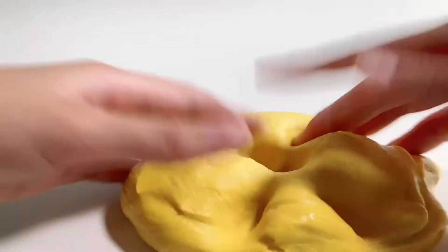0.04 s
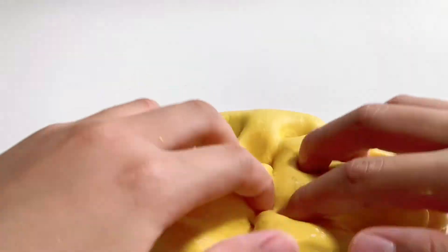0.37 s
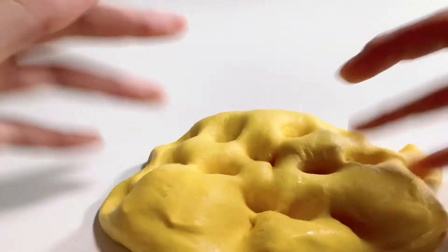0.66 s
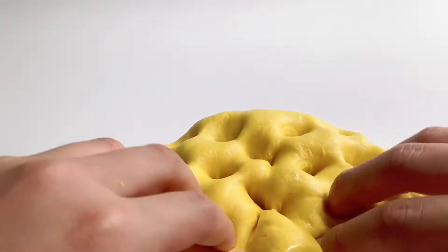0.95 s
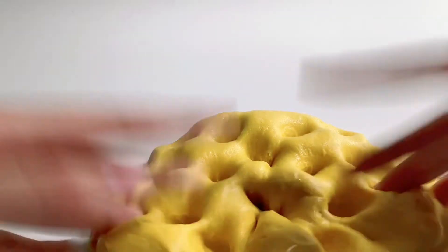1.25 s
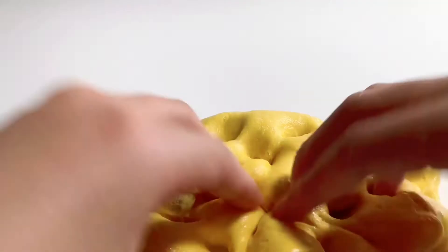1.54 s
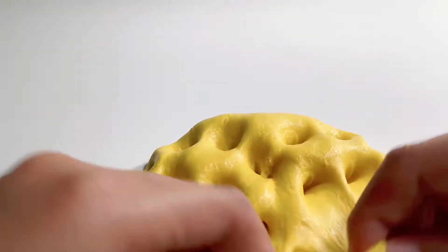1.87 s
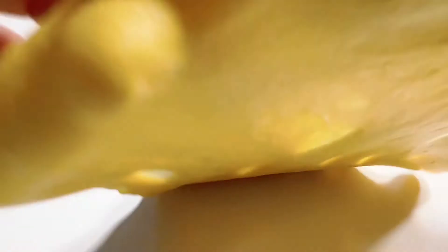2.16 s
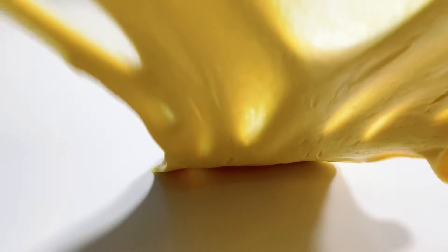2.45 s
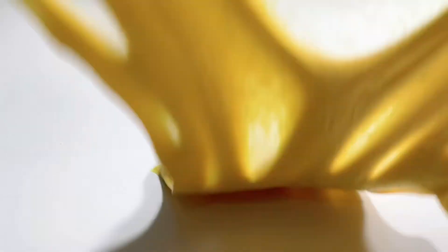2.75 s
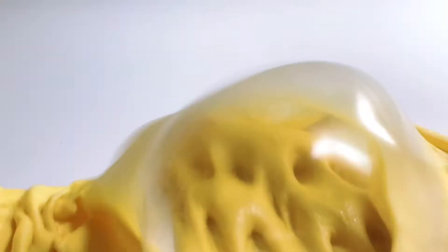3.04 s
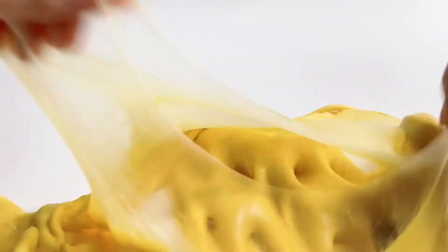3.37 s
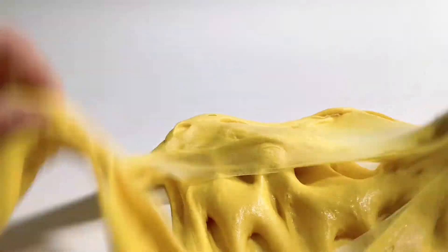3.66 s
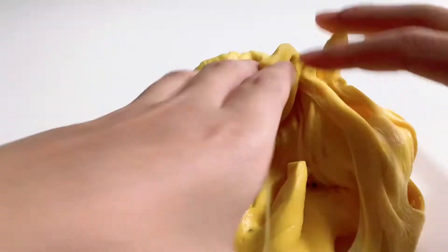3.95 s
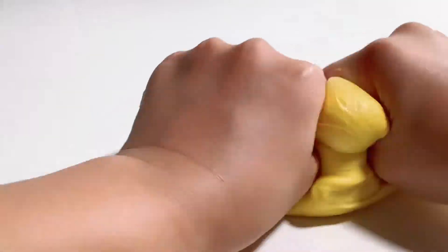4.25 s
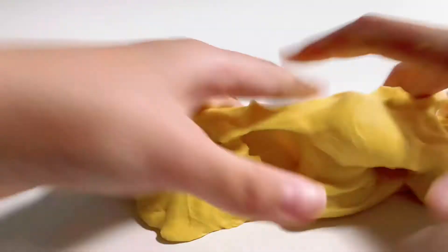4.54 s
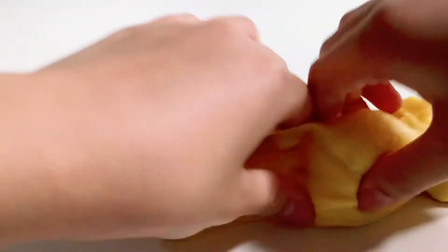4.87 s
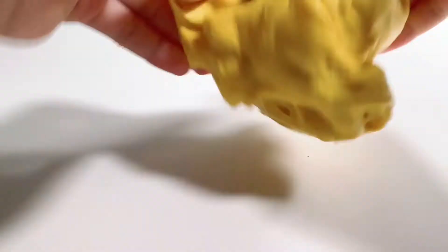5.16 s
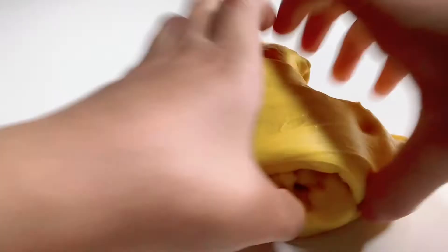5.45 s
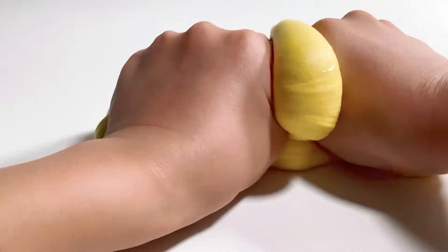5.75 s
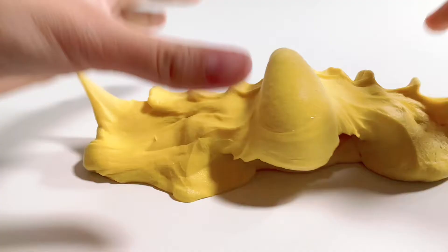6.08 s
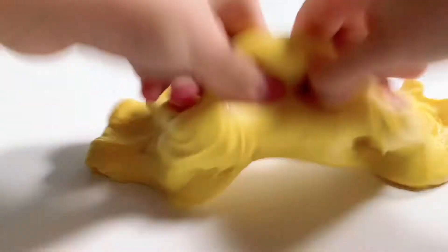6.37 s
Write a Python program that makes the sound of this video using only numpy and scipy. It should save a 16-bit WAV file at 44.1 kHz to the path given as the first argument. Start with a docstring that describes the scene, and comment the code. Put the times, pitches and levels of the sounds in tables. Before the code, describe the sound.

Close up in a small room, soft sticky slime is worked by hand on a table. Trapped air bursts in short pops that drop in pitch, mixed with thin snaps, first in separate bunches as fingers press in. A soft, fizzy stretch leads to one strong pop. Then the slime is folded and squeezed, squelching and crackling with soft thuds and another run of pops over a faint hum.

```python
"""Soft clay slime, poked, stretched and kneaded by hand on a table, close up in a small room.
Trapped air pockets burst with sticky snaps and short pops that fall in pitch as the hole relaxes.
The slime squelches and fizzes as it peels from skin and table top; presses thud, air hisses through folds.
The table colours the sound and the room echoes it, over a faint hum and a very quiet, even tick."""
import sys
import numpy as np
from scipy import signal
from scipy.fft import rfft, irfft
from scipy.io import wavfile
from scipy.ndimage import uniform_filter1d

SR = 44100
rng = np.random.default_rng(int(sys.argv[2]) if len(sys.argv) > 2 else 0)


def materialize(psi):
    """Save the field psi as 16-bit PCM at rate SR to the path in sys.argv[1].

    A 1-D psi becomes a single channel; in a 2-D psi each row is a channel.
    """
    bounded = np.clip(np.atleast_2d(psi).T, -1, 1)
    quanta = np.round(bounded * 32767).astype(np.int16)
    wavfile.write(sys.argv[1], SR, quanta)


N = 291501

# Bursting air pockets. Each row: start in seconds, pop level in dB, final pitch in Hz, fall in octaves,
# skin snap level in dB, snap brightness in dB, snap length in seconds.
AIR_POCKETS = [(0.001, -19, 283, 1.32, -38, -27.5, 0.0093), (0.0315, -17.5, 957, 1.28, -25.5, 10.5, 0.0057),
               (0.555, -23, 330, 2.7, -28, -14.5, 0.0037), (0.5739, -15.5, 600, 1.22, -23.5, -2.5, 0.005),
               (0.5805, -20, 318, 0.88, -44, -2.5, .004), (0.5936, -27, 340, 2.2, -23, -13, 0.0025),
               (0.6205, -15.5, 463, 2.1, -26.5, -2, 0.0043), (0.642, -19.5, 370, 2.1, -25.5, 0, 0.002),
               (1.2135, -12, 416, 1.87, -18.5, -6.5, 0.0033), (1.2175, -12.5, 311, 1.09, -46, -2, .003),
               (1.2301, -21, 380, 2.08, -20.5, -11.5, 0.002), (1.25, -20, 513, 1.34, -23.5, -10.5, 0.0016),
               (1.255, -26.5, 407, 1.2, -28.5, 14.5, .0024), (1.522, -28.5, 165, 1.19, -52, -12, 0.0025),
               (1.662, -43, 680, 1.3, -51.5, -10.5, 0.0024), (2.882, -23, 275, 2.6, -32, 12.5, 0.0035),
               (2.8888, -32, 322, 2.5, -28.5, -17.5, 0.013), (2.9224, -10, 660, 1.57, -16, -7.5, 0.0029),
               (3.123, -48.5, 330, 2.1, -64, -26, 0.0026), (3.5142, -26.5, 191, 1.09, -46, 1, 0.0053),
               (3.5612, -33.5, 870, 0.63, -46, -21.5, 0.0034), (4.0393, -31, 220, 2.1, -50, -14, 0.0043),
               (4.058, -29.5, 313, 1.55, -41, -15.5, 0.0089), (4.119, -31, 294, 0.85, -36.5, -10, 0.0044),
               (4.14, -17.5, 202, 0.23, -57, -6, .004), (4.2151, -20.5, 803, 0.85, -24.5, -7.5, 0.0016),
               (4.41, -21.5, 373, 0.48, -38, -6, 0.0081), (4.463, -27, 427, 0.38, -36, -15, 0.0037),
               (4.9015, -31, 397, 0.68, -22, 8, 0.0015), (5.151, -30, 323, 1.4, -47, -23, .004),
               (5.1767, -20.5, 325, 1.894, -39, -11.5, 0.004), (5.471, -21.5, 282, 1.49, -43.5, 9, .005),
               (5.483, -13, 238, 1, -46, 0, .004), (5.503, -17, 272, .9, -46, 6, .004),
               (5.521, -23.5, 310, 1.12, -44, -2, .004), (5.6397, -8.5, 380.4, 2.134, -13, -9, 0.0027),
               (5.655, -12.5, 338, 0.98, -27, -1, 0.0027), (5.697, -26, 340, 0.72, -20, 17, 0.0023),
               (5.876, -42, 443, 1.64, -33.5, -1, 0.0027), (5.8956, -26, 347, 1.32, -27.5, -10, 0.0072),
               (5.95, -11.5, 1590, 0.14, -30.5, -19, .004), (5.953, -12, 1150, 0.3, -42, -4, 0.0035),
               (6.429, -29, 340, 1.66, -55, 0, 0.004), (6.4903, -29.5, 698, 1.02, -33.5, 9, 0.0058),
               (6.595, -24, 954, 1.1, -41, 17, 0.0026), (6.6027, -27, 1010, 0.59, -44, 7, 0.0034)]
# Sticky films with no air behind them.
# Each row: start in seconds, level in dB, brightness in dB, length in seconds.
FILM_SNAPS = [(0.306, -52.5, 4.5, 0.0025), (0.6083, -27, 8, 0.0053), (0.6153, -33, 6, 0.0081),
              (1.266, -34, 7, .0027), (1.494, -46.5, 0, 0.001), (1.5973, -42, 11, 0.0013),
              (1.617, -38.5, 7, 0.0012), (1.652, -44, 15, .0017), (1.973, -39, 19, 0.0017),
              (2.039, -49, -2, 0.0019), (2.8433, -42, -2.5, 0.0039), (2.8775, -27.5, 3, .005),
              (3.2315, -34, 17.5, .0013), (3.3294, -38.5, -11, 0.0034), (3.724, -45, -16, 0.003),
              (3.8387, -48, -12, 0.004), (3.8596, -36.5, -5.5, 0.00088), (4.2621, -34, 22.5, 0.0012),
              (4.429, -31.5, -4.5, 0.006), (4.479, -31, -16, 0.007), (4.785, -62, -24, 0.0011),
              (5.188, -34.5, 19, 0.0023), (5.433, -46, -7, 0.0015), (5.454, -51.5, -1, 0.0088),
              (5.525, -31, -5.5, 0.0047), (5.573, -26, 5, 0.00073), (5.586, -31.5, 1, 0.0028),
              (5.6043, -31.5, -9, 0.0024), (6.261, -47, 3, 0.0021), (6.287, -46.5, 17, 0.0077),
              (6.3177, -43, 0, 0.015)]
# Squeezes and peels. Each row: start in seconds, end in seconds, squelch level in dB, fizz level in dB.
HAND_STROKES = [(-0.03, 0.032, -24.5, -41.5), (0.527, 0.643, -29, -50.5), (1.196, 1.254, -30.5, -43.5),
                (1.52, 1.679, -53, -65), (1.784, 1.821, -60.5, -41.5), (1.813, 1.906, -49.5, -43.5),
                (1.89, 1.984, -58.5, -47.5), (1.953, 2.06, -70, -51.5), (2.1, 2.33, -92, -70),
                (2.762, 2.87, -62, -58.5), (2.872, 2.903, -27, -42.5), (3.223, 3.362, -52, -57),
                (3.33, 3.414, -64, -54.5), (3.396, 3.51, -67, -64), (3.516, 3.623, -51.5, -51),
                (3.632, 3.732, -56, -50), (3.765, 3.868, -59, -72.5), (3.971, 4.103, -52, -47),
                (4.084, 4.18, -45, -55), (4.174, 4.214, -36.5, -54), (4.186, 4.403, -94, -53),
                (4.374, 4.525, -33, -41), (4.8, 4.916, -58.5, -61.5), (4.881, 4.928, -38, -41.5),
                (5.024, 5.104, -58, -56), (5.13, 5.228, -44, -55), (5.256, 5.32, -51.5, -59),
                (5.324, 5.452, -72, -66), (5.476, 5.527, -32, -40), (5.52, 5.64, -46, -50.5),
                (5.6, 5.738, -39.5, -43), (5.803, 5.95, -36, -42), (5.914, 5.956, -25.5, -40.5),
                (5.94, 6.052, -40, -58.5), (6.1, 6.257, -54.5, -69), (6.246, 6.355, -44.5, -53),
                (6.36, 6.593, -59.5, -65), (6.584, 6.618, -40, -47.5)]
# Fingers pressing the lump against the table. Each row: start in seconds, relative level in dB.
PRESSES = [(0.010, -29), (0.565, -25), (1.216, -22), (1.519, -32.5), (2.885, -16), (2.925, -32),
           (2.961, -43), (3.305, -36.5), (3.516, -29), (4.035, -24.5), (4.130, -20), (4.184, -25.5),
           (4.467, -28), (5.178, -35.5), (5.482, -24), (5.946, -27), (6.120, -36.5)]
# Air forced through folds.
# Each row: middle in seconds, quarter of the length in seconds, pitch in Hz, level in dB.
FOLD_LEAKS = [(2.89, 0.011, 1150, -32), (4.297, 0.086, 4430, -58.5), (5.029, 0.026, 1330, -63),
              (5.491, 0.0089, 2030, -44.5), (5.700, .050, 730, -35), (5.942, 0.012, 1750, -34),
              (6.082, .015, 1740, -58), (6.208, 0.056, 4280, -65)]
# Layer spectra. Each row: frequency in Hz, gain in dB.
SNAP_SPECTRUM = [(300, -7.5), (900, 1.5), (1600, -0.5), (3500, 3), (6000, 1), (10000, 3.5), (14500, 2),
                 (16500, -23.5)]
SQUELCH_SPECTRUM = [(40, -20), (80, -9), (150, -5.5), (250, -3.5), (340, 5.5), (480, 3), (750, -4.5),
                    (1100, -14), (2000, -43.5)]
CRACKLE_SPECTRUM = [(400, -18), (800, 4.5), (1200, -1), (2000, -3.5), (3200, -2), (5000, -20),
                    (9000, -49.5)]
FIZZ_SPECTRUM = [(1800, -35.5), (3200, -8), (4500, -2), (6300, -5), (8000, -2.5), (11000, -2.5),
                 (14500, -3), (15500, -8.5), (16200, -36)]
THUD_SPECTRUM = [(25, -38), (45, -4), (65, 1), (100, -6), (145, 6.5), (200, 0.5), (300, -12.5), (600, -38)]
HUM_SPECTRUM = [(25, -18), (42, -17.5), (56, 16), (85, -8), (120, 3.5), (200, -8), (350, -8.5),
                (800, -22.5), (2800, -35), (4600, -35.5), (5500, -19.5), (6600, -35.5), (13000, -28.5),
                (16000, -38)]
# Table-top peaks and dips. Each row: centre in Hz, width in Hz, gain in dB.
TABLE_BANDS = [(264, 25, 0.5), (302.8, 6.1, -11), (340, 81, 5), (390, 57, -11.5), (452, 54, 4.5),
               (628, 30, -9.5), (869, 110, -6.5), (1109, 94, 5), (1445, 210, 7), (2060, 200, 4.5)]
# Room echo. Each row: frequency in Hz, gain in dB, T60 in seconds.
ECHO_BANDS = [(107.3, -10.5, 0.41), (250, -19, 0.15), (600, -16, 0.3), (1065, -16, 0.49), (1700, -15, 0.51),
              (4000, -16, 0.49), (8900, -11.5, 0.36), (14900, -13.5, 0.31)]
# Rings of the background tick. Each row: pitch in Hz, width in Hz, gain in dB.
TICK_MODES = [(2530, 310, -33), (4250, 490, -35)]


def pops(cycles_to_swell=1.05, tail=0.13, tail_swells=5.1, overtone=0.26, overtone_ratio=2.153):
    """Each pocket rings a few cycles, dropping in pitch as the hole relaxes; then the lump recoils."""
    out, t = np.zeros(N), np.arange(SR // 8) / SR
    flutter, waver = drift(rate_hz=900), drift(rate_hz=350)
    bursts = [row[:4] for row in AIR_POCKETS]
    recoils = [recoil(start_s, db, fall_oct) for start_s, db, _, fall_oct in bursts]
    for start_s, db, hz, fall_oct in bursts + recoils:
        age = t * hz / cycles_to_swell  # big, low pockets open more slowly
        # the ragged hole wavers more as it slackens
        wander = np.take(waver, round(start_s * SR) + np.arange(len(t)), mode="wrap")
        wobble_oct = 0.16 * np.tanh(age / 2) * wander
        phase = 2 * np.pi * np.cumsum(hz * 2 ** (fall_oct * np.exp(-age) + wobble_oct)) / SR
        swell = age * np.exp(1 - age)
        pulse = swell * np.exp(-0.12 * (age - 1) ** 2)
        after_ring = (1 - np.exp(-age)) * np.exp(-age / tail_swells)
        envelope = (1 - tail) * pulse + tail * after_ring
        # wide tears add an overtone
        upper = overtone * fall_oct / 2 * swell * np.sin(overtone_ratio * phase)
        add(out, start_s, from_db(db) * envelope * (np.sin(phase) + upper))
    return out * (1 + 0.61 * flutter)


def recoil(pop_s, pop_db, pop_fall_oct, delay_s=0.0036, hz=342.8, fall_oct=0.9, hard_pop_db=-11.5):
    """Pop row for the lump springing back; gentle bursts and pockets that open less kick less."""
    loss_db = 4 * max(2 - pop_fall_oct, 0)
    db = -14 + 1.2 * (pop_db - hard_pop_db) - loss_db
    return pop_s + delay_s, db, hz, fall_oct


def snaps(uneven_db=7.5, dull_hz=3500, pivot_hz=5500, base_ring_hz=6400, bright_db_per_oct=13.5):
    """A film or pocket skin tears in milliseconds: a dying burst of micro-clicks with one broad ring."""
    size = 1024
    out, t = np.zeros(N), np.arange(size) / SR
    pole = np.exp(-2 * np.pi * dull_hz / SR)
    skins = [(row[0], *row[4:]) for row in AIR_POCKETS]
    for start_s, db, bright_db, length_s in skins + FILM_SNAPS:
        white, sizes = rng.standard_normal((2, size))
        age = t / length_s
        burst = white * from_db(uneven_db * sizes) * (1 - np.exp(-age / 0.05)) * np.exp(-1.1 * age)
        dull = signal.lfilter([1 - pole], [1, -pole], burst)
        burst = dull + (burst - dull) * np.exp(-0.5 * age)  # treble dies first
        # thin films snap brighter and ring higher
        tilted = [(hz, gain_db + bright_db * np.clip(np.log2(hz / pivot_hz) / 2, -0.6, 0.6))
                  for hz, gain_db in SNAP_SPECTRUM]
        burst = colour(burst, tilted, size=512)
        ring_hz = np.clip(base_ring_hz * 2 ** (bright_db / bright_db_per_oct), 1900, 13700)
        burst = burst + 0.33 * resonance(burst, ring_hz, width_hz=700 + ring_hz / 7)
        add(out, start_s, from_db(db) * rms_one(burst) * np.sqrt(length_s * SR / size))
    return out


def kneading(swell_share=0.59, release_s=0.024, crackle_trim_db=-2.5):
    """Pressure builds and lets go: big pockets squelch, small ones crackle, peeling skin fizzes."""
    t, power = np.arange(N) / SR, np.zeros((3, N))
    for start_s, end_s, squelch_db, fizz_db in HAND_STROKES:
        span = slice(max(round(start_s * SR), 0), round((end_s + 0.25) * SR))
        swell = np.clip((t[span] - start_s) / (swell_share * max(end_s - start_s, 0.01)), 0, 1)
        release = np.exp(-np.maximum(t[span] - end_s, 0) / release_s)
        crackle_db = squelch_db + 0.65 * (fizz_db - squelch_db) + crackle_trim_db
        power[:, span] += (from_db([squelch_db, crackle_db, fizz_db])[:, None] * swell * release) ** 2
    squelch_gain, crackle_gain, fizz_gain = np.sqrt(power)
    squelch = colour(grains(per_s=570, spread_db=1, clump_db=7, clump_hz=160, hiss=0.21),
                     SQUELCH_SPECTRUM)
    crackle = colour(grains(per_s=850, spread_db=4, clump_db=3, clump_hz=180, hiss=0.45),
                     CRACKLE_SPECTRUM)
    fizz = colour(grains(per_s=2800, spread_db=4.5, clump_db=2.5, clump_hz=250, hiss=0.6),
                  FIZZ_SPECTRUM)
    bubbles = tiny_bubbles(per_s=170, q=7.9, low_hz=800, high_hz=7000, pitch_count=16)
    crackle = rms_one(crackle) + 0.6 * bubbles
    return squelch_gain * rms_one(squelch) + crackle_gain * rms_one(crackle) + fizz_gain * rms_one(fizz)


def grains(per_s, spread_db, clump_db, clump_hz, hiss):
    """Tiny uneven ruptures in clumps over a hiss, levelled over 30 ms."""
    sizes = uneven_sizes(spread_db) * rng.choice([-1, 1], N)
    clicks = rms_one(sizes * (rng.random(N) < per_s / SR)) + hiss * rng.standard_normal(N)
    clicks = clicks * from_db(clump_db * drift(clump_hz))
    return clicks / np.sqrt(uniform_filter1d(clicks ** 2, size=1323) + 1e-9)


def tiny_bubbles(per_s, q, low_hz, high_hz, pitch_count):
    """Pinhead bubbles burst at random, each ringing briefly at one of a set of pitches."""
    kicks = uneven_sizes(spread_db=4) * (rng.random(N) < per_s / SR)
    pitch_index = rng.integers(0, pitch_count, N)
    rings = (resonance(kicks * (pitch_index == k), hz, hz / q) / np.sqrt(hz)
             for k, hz in enumerate(np.geomspace(low_hz, high_hz, pitch_count)))
    return rms_one(sum(rings))


def thuds(gain_db=-10.5, swell_s=0.019):
    """Each finger press gives a dull rumble that swells and dies."""
    force, age = np.zeros(N), np.arange(SR // 2) / SR / swell_s
    for start_s, db in PRESSES:
        add(force, start_s, from_db(db) * age * np.exp(1 - age))
    rumble = colour(rng.standard_normal(N), THUD_SPECTRUM)
    running_rms = np.sqrt(uniform_filter1d(rumble ** 2, size=1764) + 1e-12)
    return from_db(gain_db) * force * rumble / running_rms


def leaks(q=3.8):
    """Air leaves a fold as a brief, narrow hiss, pitched by the size of the gap."""
    out = np.zeros(N)
    for middle_s, quarter_s, hz, db in FOLD_LEAKS:
        window = np.hanning(round(4 * quarter_s * SR))
        noise = rng.standard_normal(SR)[:len(window)]
        hiss = resonance(resonance(noise, hz, hz / q), hz, hz / q)
        add(out, middle_s - 2 * quarter_s, from_db(db) * window * rms_one(hiss))
    return out


def surface_ticks(gain_db=-83):
    """Tiny surface bubbles tick faintly throughout."""
    bubbles = tiny_bubbles(per_s=45, q=2, low_hz=2000, high_hz=9000, pitch_count=8)
    return from_db(gain_db) * colour(bubbles, SNAP_SPECTRUM)


def table_top(x):
    """The table top and its reflections impose a chain of peaks and dips."""
    for hz, width_hz, db in TABLE_BANDS:
        height, half_width = np.sqrt(from_db(db)), np.pi * width_hz / SR
        tuning = -2 * np.cos(2 * np.pi * hz / SR)
        b = [1 + half_width * height, tuning, 1 - half_width * height]
        a = [1 + half_width / height, tuning, 1 - half_width / height]
        x = signal.lfilter(b, a, x + 1e-18)
    return x


def room_echo(x, build_s=0.0096, band_count=9):
    """Diffuse echo: builds quickly, dies away band by band."""
    t, response = np.arange(SR // 2) / SR, 0
    build = 1 - np.exp(-(t / build_s) ** 2)
    edges_hz = np.geomspace(50, 17000, band_count + 1)
    for low_hz, high_hz in zip(edges_hz, edges_hz[1:]):
        hz = np.sqrt(low_hz * high_hz)
        db, t60_s = at_hz(ECHO_BANDS, hz), at_hz(ECHO_BANDS, hz, column=2)
        bandpass = signal.butter(2, [low_hz, high_hz], "band", fs=SR, output="sos")
        band = signal.sosfilt(bandpass, rng.standard_normal(len(t))) * build * from_db(-60 * t / t60_s)
        to_unity = np.sqrt(2 * (high_hz - low_hz) / SR / np.sum(band ** 2))
        response = response + from_db(db) * to_unity * band
    return signal.fftconvolve(x, response)[:N]


def room_hum(level_db=-56.5):
    """Faint, steady noise, strongest in the bass."""
    return from_db(level_db) * rms_one(colour(rng.standard_normal(N), HUM_SPECTRUM, size=16384))


def even_ticks(per_s=30, first_s=0.016):
    """A very quiet, regular tick ringing at two pitches."""
    clicks = np.diff(np.floor((np.arange(N + 1) / SR - first_s) * per_s))
    return sum(from_db(db) * resonance(resonance(clicks, hz, width_hz), hz, width_hz)
               for hz, width_hz, db in TICK_MODES)


def from_db(db):
    """Decibels to gain."""
    return 10 ** (np.asarray(db) / 20)


def rms_one(x):
    """Scale to rms 1."""
    return x / np.sqrt(np.mean(x ** 2) + 1e-20)


def at_hz(rows, hz, column=1):
    """Read a table column on a log-frequency axis."""
    rows = np.array(rows)
    return np.interp(np.log(np.maximum(hz, 1)), np.log(rows[:, 0]), rows[:, column])


def add(out, start_s, sound):
    """Mix a sound in at start_s."""
    i = max(round(start_s * SR), 0)
    out[i:i + len(sound)] += sound[:max(N - i, 0)]


def colour(x, spectrum, size=4096):
    """Minimum-phase filter with the given spectrum."""
    cepstrum = irfft(np.log(from_db(at_hz(spectrum, np.fft.rfftfreq(size, 1 / SR)))))
    cepstrum[1:size // 2] *= 2
    cepstrum[size // 2 + 1:] = 0
    return signal.fftconvolve(x, irfft(np.exp(rfft(cepstrum))))[:len(x)]


def resonance(x, hz, width_hz):
    """Two-pole resonance, peak gain 1."""
    r = np.exp(-np.pi * width_hz / SR)
    b = np.array([1, 0, -1]) * (1 - r * r) / 2
    return signal.lfilter(b, [1, -2 * r * np.cos(2 * np.pi * hz / SR), r * r], x + 1e-18)


def drift(rate_hz):
    """Random wander between unit-spread knots."""
    return np.interp(np.arange(N) * rate_hz / SR, np.arange(N), rng.standard_normal(N))


def uneven_sizes(spread_db):
    """Random gains: mostly small, a few large."""
    return from_db(spread_db * np.minimum(rng.exponential(1, N), 3))


def scene(via_table_share=0.6):
    """Slime, echo and background, mono; only part of the sound reaches the room via the table."""
    slime = pops() + snaps() + kneading() + thuds() + leaks() + surface_ticks()
    near = table_top(slime)
    echo = room_echo(slime + via_table_share * (near - slime))
    return (near + echo + room_hum() + even_ticks())[None]


def record(dry):
    """The microphone drops the deepest bass, clips at full scale and cuts the top."""
    bass_cut_hz, stopband_hz = 40, 16900
    highpass = signal.butter(3, bass_cut_hz, "high", fs=SR, output="sos")
    lowpass = signal.cheby2(16, 60, stopband_hz, fs=SR, output="sos")
    return signal.sosfilt(lowpass, np.clip(signal.sosfilt(highpass, dry), -1, 1))


dry = scene()
out = record(dry)
materialize(out)
```